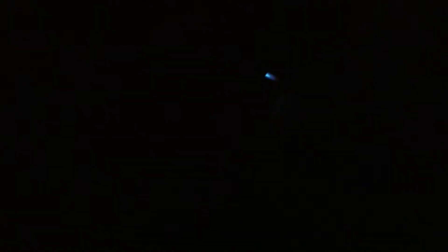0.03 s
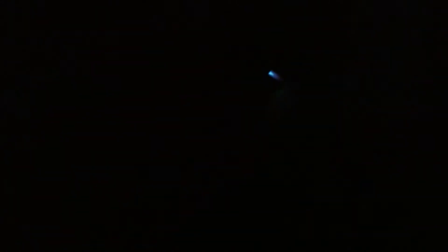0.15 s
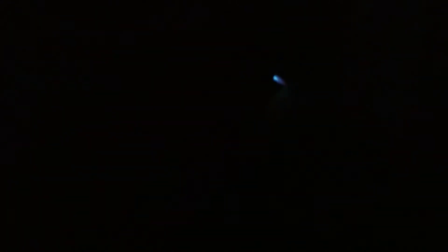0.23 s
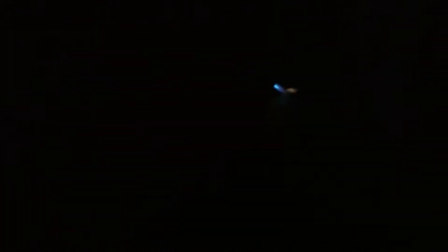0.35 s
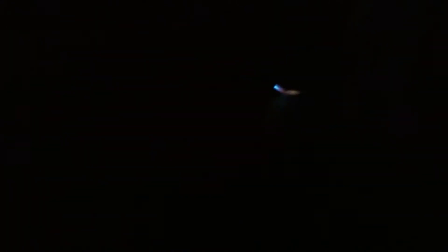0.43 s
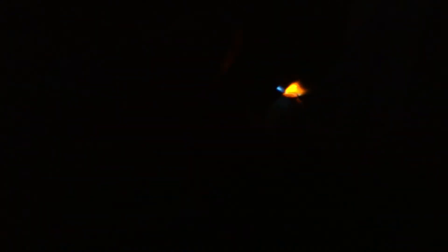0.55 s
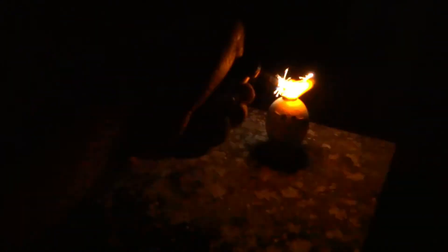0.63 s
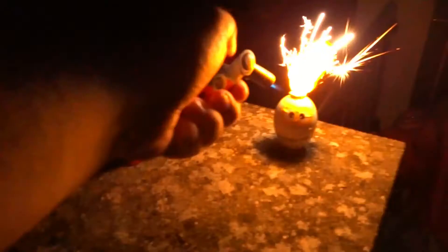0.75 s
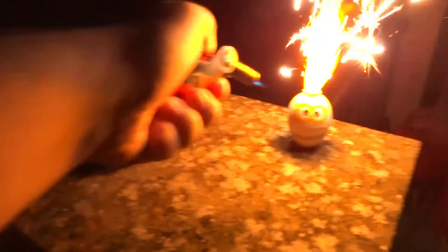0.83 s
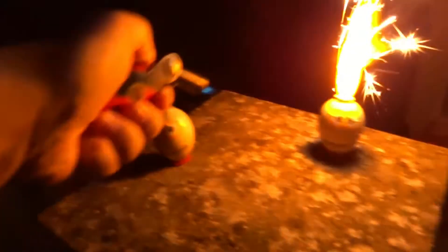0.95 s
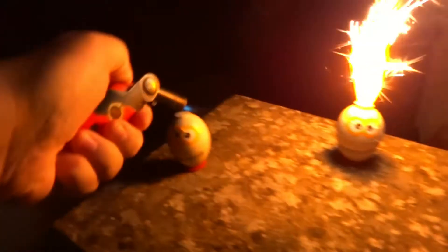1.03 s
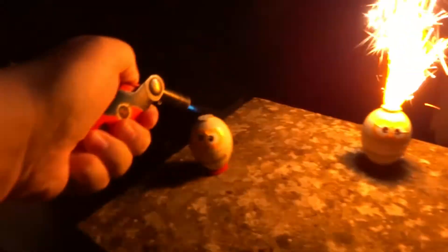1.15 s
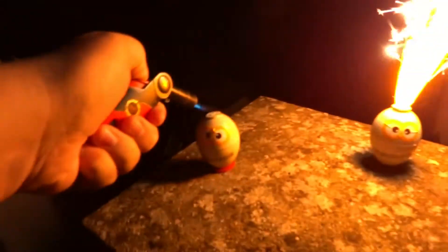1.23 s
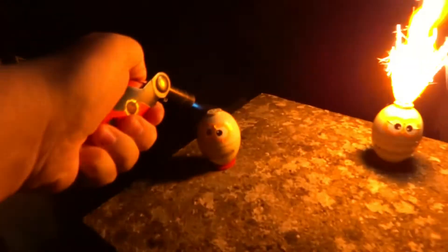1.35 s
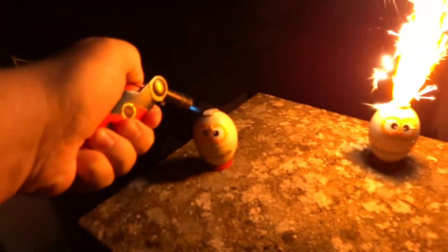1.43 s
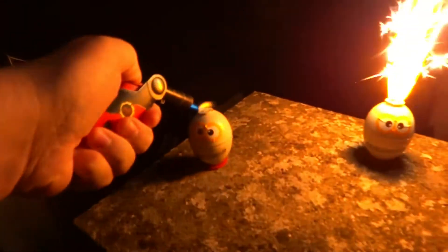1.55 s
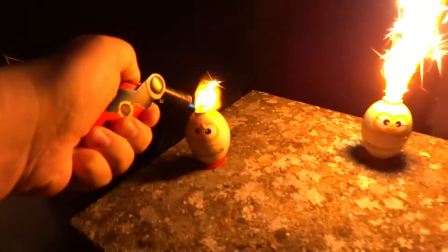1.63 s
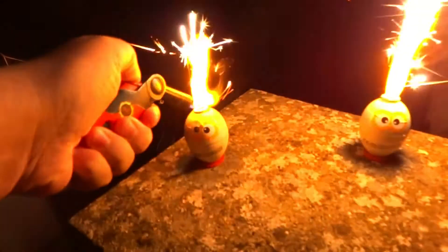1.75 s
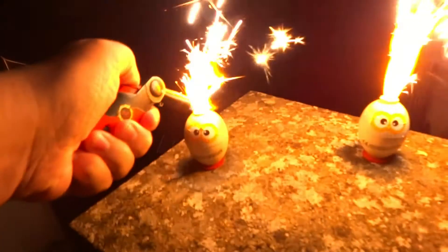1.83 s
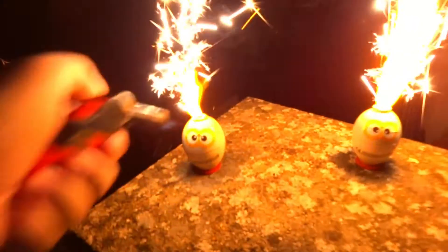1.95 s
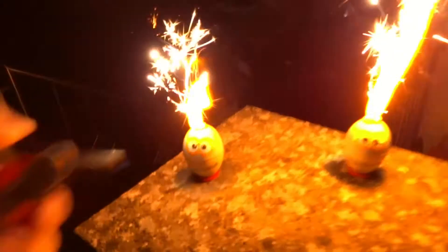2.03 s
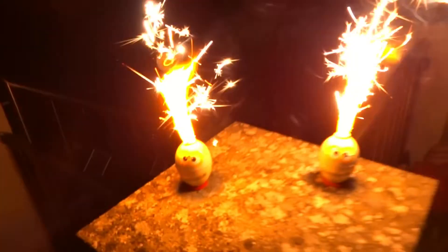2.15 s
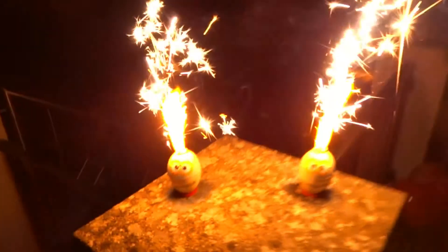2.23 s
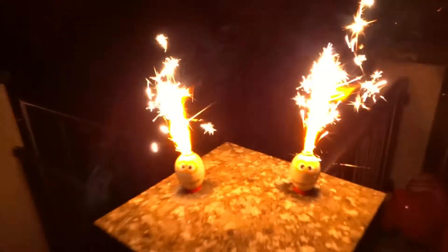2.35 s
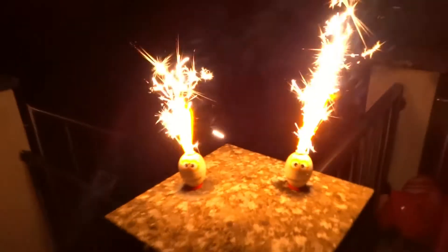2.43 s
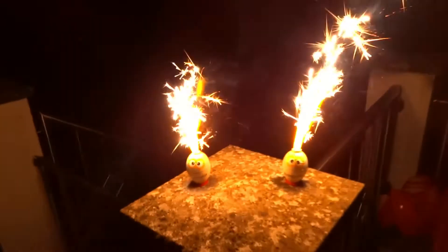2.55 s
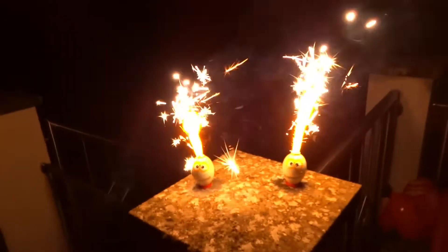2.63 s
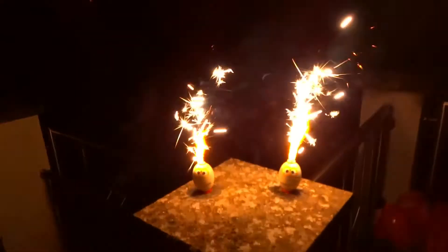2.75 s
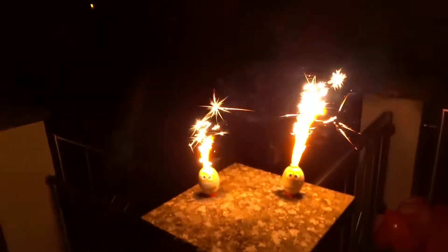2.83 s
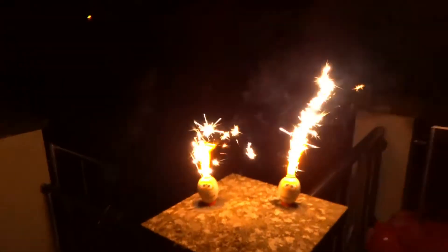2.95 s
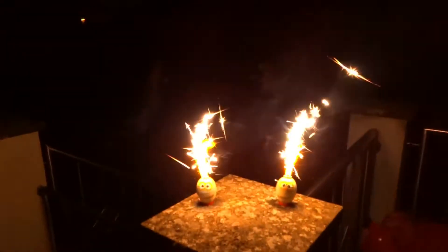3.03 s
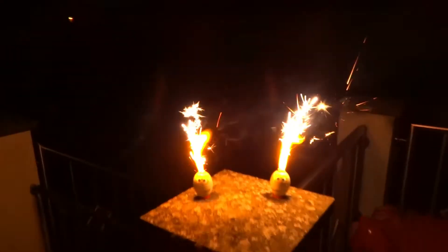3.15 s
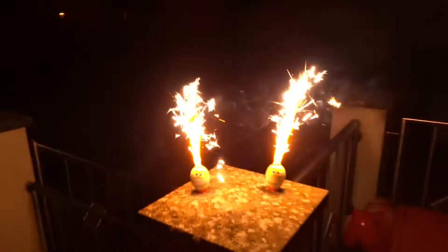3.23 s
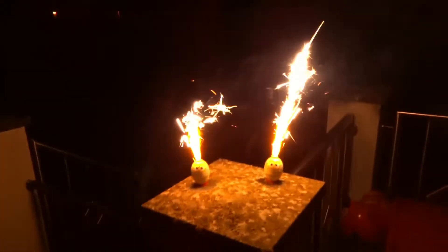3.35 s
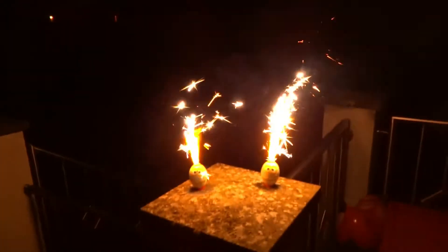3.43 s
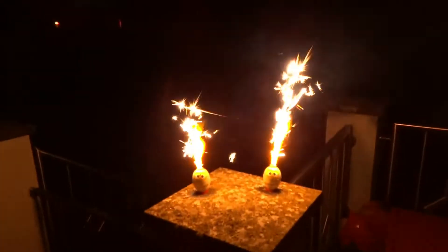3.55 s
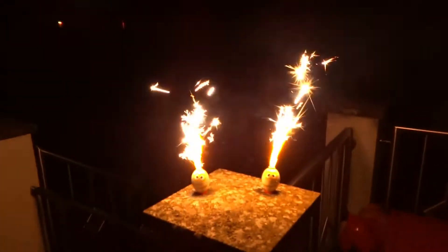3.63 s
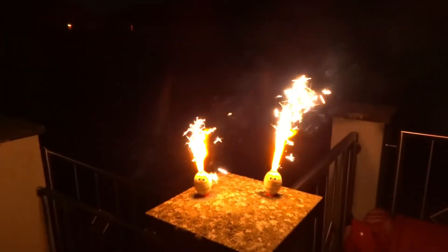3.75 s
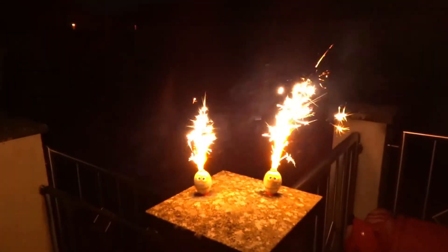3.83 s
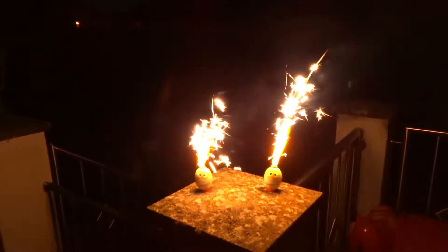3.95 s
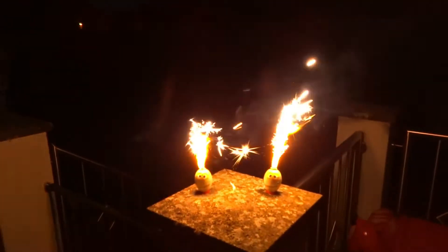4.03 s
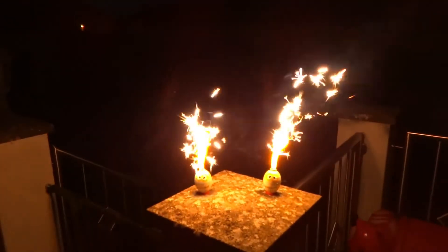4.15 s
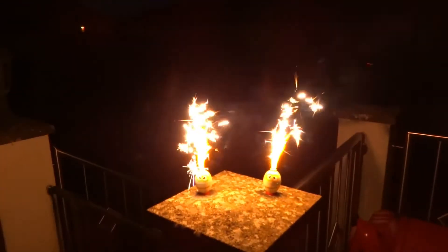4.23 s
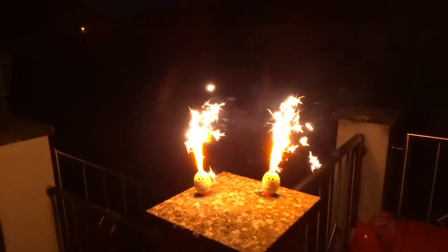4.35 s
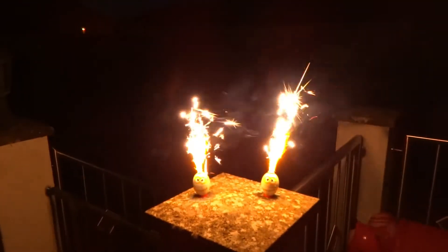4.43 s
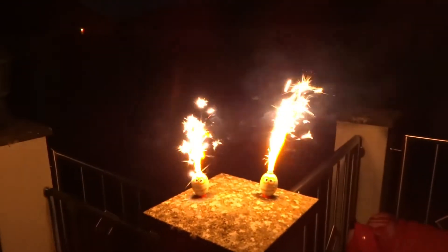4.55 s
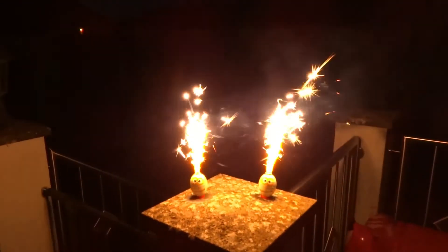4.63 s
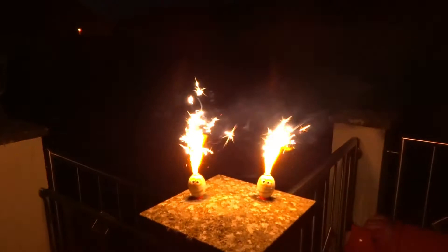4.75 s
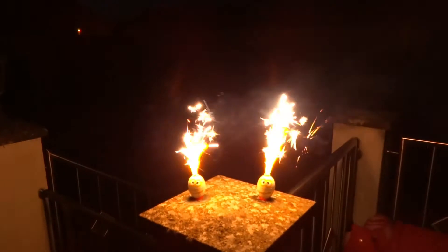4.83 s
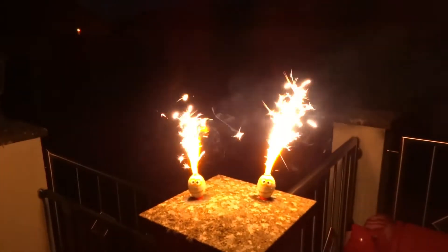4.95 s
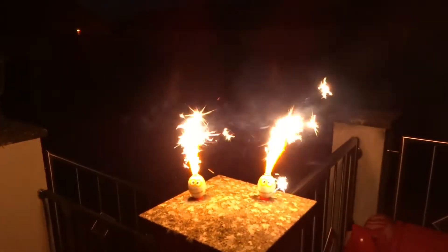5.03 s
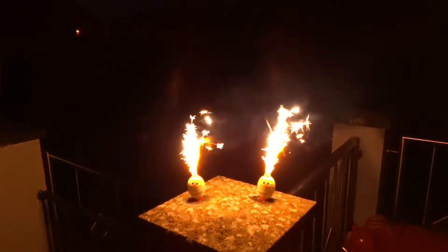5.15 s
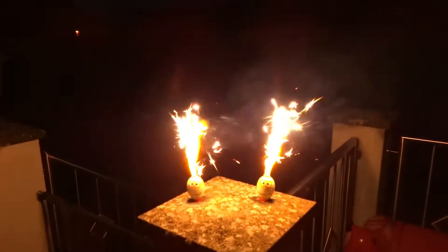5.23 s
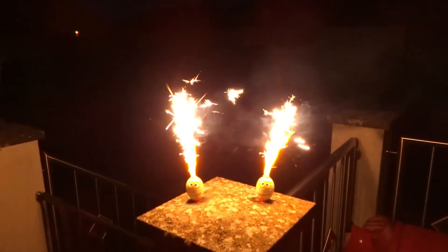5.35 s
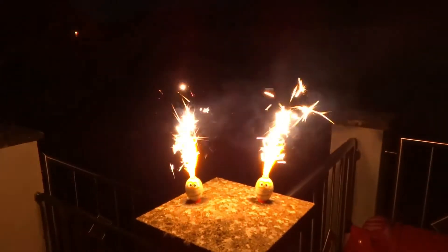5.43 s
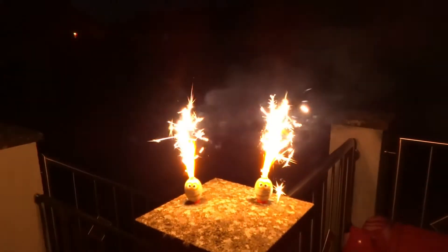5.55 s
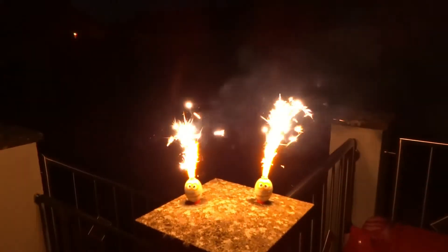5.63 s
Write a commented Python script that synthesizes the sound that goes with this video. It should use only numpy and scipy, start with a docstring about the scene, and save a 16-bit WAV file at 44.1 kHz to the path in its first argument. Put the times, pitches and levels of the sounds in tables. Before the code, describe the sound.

Outdoors on a quiet terrace, a jet lighter gives a thin, faint hiss close to the microphone. A brief fizz swells as a small fountain firework catches and rushes. A second one flares with a soft whoosh, and the lighter stops. Both burn on with a bright hiss, dense crackle, irregular sharp pops and a few faint low thumps, slightly to the right at first, then near the centre.

```python
"""A terrace at night: two small fountain fireworks on a stone table, a little right of the microphone.
Close by, a jet lighter hisses. The first priming fizzes and its fountain catches; the second flares up
with a soft whoosh. Each gas jet rushes and throws metal grains that burst in a dense crackle, the
largest as sharp pops. Now and then a nozzle coughs out slag. Faint night air lies behind it all."""
import sys
import numpy as np
from scipy import signal
from scipy.fft import rfft, irfft
from scipy.io import wavfile
from scipy.ndimage import map_coordinates

SR = 44100
rng = np.random.default_rng(int(sys.argv[2]) if len(sys.argv) > 2 else 0)


def to_wav(sig):
    """Store sig (one row per channel, or 1-D mono) as 16-bit WAV at the path in sys.argv[1].

    Samples outside -1..1 are clipped; the rate is SR.
    """
    pcm = np.clip(np.atleast_2d(sig), -1, 1) * 32767
    pcm = np.round(pcm).astype(np.int16)
    wavfile.write(sys.argv[1], SR, pcm.T)  # frames by channels


N = 251370
TIME = np.arange(N) / SR


def from_db(db):
    """Decibels to gain."""
    return 10 ** (np.asarray(db) / 20)


def unit_rms(x):
    """Scale to unit power."""
    return x / np.sqrt(np.mean(x ** 2) + 1e-20)


def curves(rows):
    """Each column after the time column, interpolated at every sample."""
    times, *columns = np.transpose(rows)
    return [np.interp(TIME, times, column) for column in columns]


def drift(rate_hz):
    """A smooth random wander with a spread of 1."""
    hop = 40
    pole = np.exp(-2 * np.pi * rate_hz * hop / SR)
    noise = rng.standard_normal(N // hop + 2002)
    slow = signal.lfilter([1], [1, -2 * pole, pole * pole], noise)[2000:]
    return np.interp(np.arange(N) / hop, np.arange(len(slow)), unit_rms(slow))


def coloured(x, colour, size=4096):
    """Minimum-phase filter shaped like the given spectrum; keeps the power of white noise."""
    hz, db = np.transpose(colour)
    grid_hz = np.maximum(np.arange(size // 2 + 1) * SR / size, 1)
    gain = from_db(np.interp(np.log(grid_hz), np.log(hz), db))
    cepstrum = irfft(np.log(gain))
    cepstrum[1:size // 2] *= 2
    cepstrum[size // 2 + 1:] = 0
    response = irfft(np.exp(rfft(cepstrum)))
    return signal.oaconvolve(x, response / np.linalg.norm(response))[:N]


def resonance(x, hz, width_hz):
    """Two-pole band-pass with gain 1 at its peak."""
    radius = np.exp(-np.pi * width_hz / SR)
    feedback = [1, -2 * radius * np.cos(2 * np.pi * hz / SR), radius ** 2]
    return signal.lfilter(np.array([1, 0, -1]) * (1 - radius ** 2) / 2, feedback, x)


def lowpass(x, hz):
    """Gentle first-order treble cut."""
    return signal.sosfilt(signal.butter(1, hz, fs=SR, output="sos"), x)


# Still night air around the microphone: (frequency [Hz], relative level [dB])
AIR_SPECTRUM = [(20, -22), (120, -16), (300, -5), (650, 1), (1500, -13), (3000, -6), (6000, -25),
                (15000, -36)]
def night_air(level_db=-62):
    """A faint outdoor rush, different in each channel."""
    return from_db(level_db) * np.array([coloured(rng.standard_normal(N), AIR_SPECTRUM) for _ in range(2)])


# The lighter, close to the microphone: (time [s], relative level [dB])
LIGHTER_LEVEL = [(0, -55), (.18, -54.5), (.3, -53), (.45, -52.5), (.6, -52)]
# Its flame: (frequency [Hz], relative level [dB])
FLAME_SPECTRUM = [(59, -68), (100, -35), (261, -16.5), (388, -16.5), (621, 2), (709, 4), (1400, -12),
                  (1650, -15), (2280, -12), (3450, -21), (5410, -40), (6180, -18), (7460, -33), (9000, -31),
                  (11700, -30), (19800, -120)]
# Its nozzle's resonances: (frequency [Hz], width [Hz], gain [dB])
NOZZLE_MODES = [(10850, 2100, -7), (13550, 1850, 0)]
def lighter(flame_db=-1, hiss_db=6, eddies_db=-7, start_pitch=.87, settle_s=.11, off_s=1.9):
    """A soft flame roar and two nozzle resonances, whose pitch rises as the gas flow settles."""
    level_db, = curves(LIGHTER_LEVEL)
    gas, hiss = rng.standard_normal(N), 0
    for hz, width, db in NOZZLE_MODES:
        drive = gas + from_db(eddies_db) * rng.standard_normal(N)
        hiss += from_db(db) * resonance(resonance(drive, hz, width), hz, width)
    pitch = 1 - (1 - start_pitch) * np.exp(-TIME / settle_s)
    hiss = map_coordinates(unit_rms(hiss), [np.cumsum(pitch)], order=5)
    flame = coloured(rng.standard_normal(N), FLAME_SPECTRUM)
    return from_db(level_db) * (from_db(hiss_db) * hiss + from_db(flame_db) * flame) * (TIME < off_s)


# On the table, the first priming smoulders and catches: (time [s], level [dB])
PRIMING_LEVEL = [(.5, -66), (.6, -59.5), (.68, -48), (.71, -46), (.75, -35), (.82, -48), (.9, -70)]
def priming(mouth_hz=3100, width_hz=2200, spit_db=3):
    """A spitting fizz in the mouth of the first tube."""
    level_db, = curves(PRIMING_LEVEL)
    fizz = resonance(resonance(rng.standard_normal(N), mouth_hz, width_hz), mouth_hz, width_hz)
    return from_db(level_db + spit_db * drift(60)) * unit_rms(fizz)


def spark_bursts(per_s=900, spread_db=11, clump_db=1.5, largest_db=23.5):
    """Metal grains burst at random, in small clumps: many tiny ones, fewer large ones."""
    bursting = rng.random(N) < per_s * from_db(clump_db * drift(40)) / SR
    size_db = largest_db * np.tanh(spread_db * rng.exponential(1, N) / largest_db)
    return bursting * from_db(size_db) * rng.choice([-1, 1], N)


def jet(sparks, spectrum, spark_share, flutter_db):
    """One band of turbulent gas noise and bursts; each burst gets a random weight in this band."""
    bursts = unit_rms(sparks * rng.uniform(0.38, 1, N))
    gas = unit_rms(rng.standard_normal(N) * from_db(flutter_db * drift(50)))
    return coloured(np.sqrt(spark_share) * bursts + np.sqrt(1 - spark_share) * gas, spectrum)


SMOULDER_AT_S, CATCH_AT_S, OPENING_S = 0.61, 0.675, 0.12
# Vigour of the burn: (time [s], relative rush level [dB], relative sizzle level [dB])
BURN_LEVELS = [(0.78, -32, -25.5), (1.2, -30.5, -28), (1.32, -33.5, -29), (1.44, -30.0, -28.5),
               (1.92, -29.5, -24), (2.22, -29, -24), (2.28, -28.5, -24.5), (2.76, -32.0, -23.0),
               (2.82, -29, -26.0), (3.06, -33.5, -25.5), (3.12, -31, -24.5), (3.6, -34, -27),
               (3.72, -32.5, -26), (3.78, -34, -28), (3.9, -31, -22), (3.96, -34.5, -28.5),
               (4.68, -32, -24.0), (4.74, -33, -28.5), (4.92, -31.5, -23.0), (5.16, -32, -27.5),
               (5.34, -31, -22.5), (5.52, -34, -28), (5.58, -32, -24.5), (5.7, -32, -26.5)]
def burn(smoulder_db=-16, stall_s=0.012):
    """Rush and sizzle in dB: the charge catches, opens to full strength and sags after most coughs."""
    sag_db = smoulder_db * np.clip(1 - (TIME - CATCH_AT_S) / OPENING_S, 0, 1)
    for start_s, _, stall_db in SLAG_COUGHS:
        age = np.maximum(TIME - start_s, 0) / stall_s
        sag_db -= stall_db * age * np.exp(1 - age)   # deepest at stall_s, then pressure builds again
    return [level_db + sag_db for level_db in curves(BURN_LEVELS)]


# The hiss fades as the microphone draws back: (time [s], relative level [dB])
HISS_FADE = [(.7, -5), (1.25, -0.5), (1.7, -1.5), (2.2, -5), (2.65, -5), (3.1, -7), (4.2, -6.5),
             (5.7, -8.5)]
# The jets' low rush, high hiss and topmost sizzle, each: (frequency [Hz], relative level [dB])
RUSH_SPECTRUM = [(30, -42), (100, -26), (150, -19.5), (200, -11.5), (400, -7), (480, -0.5), (620, 2.5),
                 (820, 3), (1050, -2), (1350, 1.5), (1620, 0), (2600, 4), (3700, 4.5), (5300, 1), (7000, 0),
                 (12000, -31)]
HISS_SPECTRUM = [(3500, -31), (5600, -5), (7200, 7), (8500, 7.5), (10000, -14.5), (14000, -24.5)]
SIZZLE_SPECTRUM = [(3000, -49), (7000, -8.5), (9200, 2), (11000, 4.5), (13300, 4), (14200, 0.5),
                   (15200, -8), (16000, -23)]
def fountains(rush_db=-1.48, hiss_db=-3.5, sizzle_db=-3, sputter_db=0.48, surge_db=0.46):
    """The burning charge sputters; rush, hiss and sizzle share the same sparks, and the treble surges."""
    low_db, high_db = burn()
    high_db += surge_db * drift(16)
    fade_db, = curves(HISS_FADE)
    sparks = spark_bursts()
    rush = from_db(low_db + rush_db) * jet(sparks, RUSH_SPECTRUM, spark_share=0.28, flutter_db=2)
    hiss = from_db(high_db + hiss_db) * jet(sparks, HISS_SPECTRUM, spark_share=0.87, flutter_db=2.5)
    sizzle = from_db(high_db + sizzle_db) * jet(sparks, SIZZLE_SPECTRUM, spark_share=0.64, flutter_db=0.5)
    lit = np.clip((TIME - SMOULDER_AT_S) / (CATCH_AT_S - SMOULDER_AT_S), 0, 1) ** .5
    return lit * from_db(sputter_db * drift(22)) * (rush + from_db(fade_db) * hiss + sizzle)


def small_pops(per_s=30, body_spread_db=3, snap_spread_db=1.8):
    """Lesser grains burst at random once the fountain is open; rows as in LOUD_POPS."""
    times = TIME[(rng.random(N) < per_s / SR) & (TIME > CATCH_AT_S + OPENING_S)]
    body, snap = np.clip(rng.standard_normal((N, 2))[:len(times)], -2, 2).T
    return np.column_stack([times, -25 + body_spread_db * body, -15 + snap_spread_db * snap])


# The loudest sparks over the table: (time [s], relative body level [dB], relative snap level [dB])
LOUD_POPS = [(0.6705, -24, -25), (0.7707, -17.5, -10), (0.8865, -14.5, -12.5), (0.9036, -18.5, -8),
             (0.9336, -14.5, -9.5), (0.9851, -11, -10), (1.0639, -13.5, -22), (1.1747, -14.5, -8),
             (1.2352, -9, -16), (1.3935, -11.5, -17), (1.4873, -11, -16), (1.5116, -15.5, -7.5),
             (1.7818, -18.0, -11), (1.8053, -14, -11.0), (2.0315, -19, -21), (2.0548, -10, -13),
             (2.2052, -9, -10.0), (2.2641, -11.5, -10), (2.4387, -33, -6), (2.5779, -13.5, -5),
             (2.7013, -11.5, -9), (2.7859, -17, -7.0), (2.8061, -9.5, -23), (2.8921, -17, -19),
             (3.0978, -32, -7), (3.1462, -10, -5.5), (3.4017, -14, -15), (3.5227, -32, -4.5),
             (3.6392, -13, -25), (3.6486, -12, -25), (3.7195, -20.5, -7), (3.7699, -30, -11),
             (3.9785, -16, -10.0), (4.0376, -27, -12), (4.0603, -19, -13), (4.2662, -24, -11),
             (4.2923, -18.5, -9), (4.4582, -15.5, -18), (4.5576, -14.5, -10), (4.5974, -14, -9.5),
             (4.649, -8.5, -13.0), (5.0093, -13, -11), (5.0553, -10, -9)]
# The body of a pop: (frequency [Hz], relative level [dB])
BODY_SPECTRUM = [(30, -21.5), (150, -16.5), (600, 7.5), (1500, 10), (3000, 12.5), (5500, 6.5), (9000, 3.5),
                 (15000, -45)]
def pops(snap_gain_db=7, body_gain_db=9.5):
    """A large grain bursts in one pressure pulse: a bright snap over a duller body."""
    times, body_db, snap_db = np.vstack([LOUD_POPS, small_pops()]).T
    onsets = np.clip(np.round(times * SR).astype(int), 0, N - 1)
    snaps, bodies = np.zeros((2, N))
    snaps[onsets] = from_db(snap_db + snap_gain_db)
    bodies[onsets] = from_db(body_db + body_gain_db)
    return coloured(snaps, SIZZLE_SPECTRUM) + coloured(bodies, BODY_SPECTRUM)


# A nozzle coughs out slag and its jet stalls: (time [s], relative thump level [dB], stall depth [dB])
SLAG_COUGHS = [(0.923, -56, 2), (1.175, -64, 4), (1.237, -49, 1), (1.345, -60, 1.5), (1.581, -53, 3),
               (1.772, -50, 2), (1.88, -54, 0.5), (2.055, -49, 3.5), (2.206, -49, 2), (2.265, -56, 1.5),
               (2.784, -60, 6.5), (3.104, -58, 7.5), (4.292, -64, -1.5), (5.405, -59, 0.5)]
def coughs(gain_db=9, swell_s=0.0031, cutoff_hz=200):
    """Each cough is one swell of pressure, heard as a faint low thump."""
    pressure = np.zeros(N)
    for start_s, thump_db, _ in SLAG_COUGHS:
        age = np.maximum(TIME - start_s, 0) / (swell_s / 2)
        pressure += from_db(thump_db + gain_db) * age * (2 - age) * np.exp(-np.minimum(age, 50))
    return lowpass(pressure, cutoff_hz)


# The second fountain flares up: (time [s], relative level [dB])
FLARE_LEVEL = [(1.52, -60), (1.555, -36), (1.58, -30), (1.603, -39), (1.622, -34), (1.645, -32.5),
               (1.675, -41), (1.76, -60)]
# Its soft whoosh: (frequency [Hz], relative level [dB])
FLARE_SPECTRUM = [(40, -35), (100, -16), (150, -14.5), (220, -7.5), (300, -2.5), (450, -3), (590, 0.5),
                  (800, -3), (1200, -2.5), (1700, -3.5), (4000, -32)]
def flare(flame_db=-1, ring_db=1.5):
    """The second priming catches in two quick puffs of flame that set table and terrace ringing."""
    level_db, = curves(FLARE_LEVEL)
    burning = (TIME > FLARE_LEVEL[0][0]) & (TIME < FLARE_LEVEL[-1][0])
    flame = burning * from_db(level_db + flame_db) * coloured(rng.standard_normal(N), FLARE_SPECTRUM)
    return flame + from_db(ring_db) * sum(resonance(flame, hz, width) for hz, width, _ in LOW_MODES)


# Low resonances of table and terrace: (frequency [Hz], width [Hz], gain [dB])
LOW_MODES = [(146, 10, -3), (302, 20, -3), (552, 22, -10), (648, 26, -9)]
# Reflections reaching the microphone off the table top and nearby things: (delay [s], gain [dB])
NEAR_ECHOES = [(.00078, -45), (.00155, -25)]
def terrace(x, first_wall_s=0.0037, t60_s=0.16, mid_db=-18, side_db=-25, wall_cut_hz=7000):
    """Direct sound, close reflections, low resonances and a short scatter off walls and railings."""
    echoes = sum(from_db(db) * np.pad(x, (int(delay * SR), 0))[:N] for delay, db in NEAR_ECHOES)
    ring = sum(from_db(db) * resonance(x, hz, width) for hz, width, db in LOW_MODES)
    t = TIME[:SR // 2]
    decay = from_db(-60 * t / t60_s) * (t > first_wall_s)
    tails = lowpass(rng.standard_normal((2, len(t))) * decay, wall_cut_hz)
    mid, side = [signal.oaconvolve(x, tail / np.linalg.norm(tail))[:N] for tail in tails]
    return x + echoes + ring + from_db(mid_db) * mid + from_db(side_db) * side * np.array([[1], [-1]])


# Direction of the table from the microphone: (time [s], left minus right [dB])
TABLE_BALANCE = [(.4, -.1), (.8, -1), (1.2, -3.5), (1.6, -3.2), (2.2, -1.2), (2.8, -.6), (3.6, -.3),
                 (5.7, -.15)]
def panned(x, shadow_hz=800):
    """The table lies a little to the right at first; the bass reaches both sides alike."""
    balance_db, = curves(TABLE_BALANCE)
    bass = lowpass(x, shadow_hz)
    return bass + (x - bass) * from_db(np.array([[.5], [-.5]]) * balance_db)


def scene():
    """The fountains fill the terrace; the small lighter is heard close and dry."""
    table = priming() + fountains() + pops() + coughs() + flare()
    return panned(terrace(table) + lighter()) + night_air()


def record(dry):
    """The highest peaks are rounded and the top of the treble is cut steeply."""
    cutoff_hz = 15750
    return signal.sosfilt(signal.ellip(12, .1, 90, cutoff_hz, fs=SR, output="sos"), np.tanh(dry))


dry = scene()
out = record(dry)
to_wav(out)
```